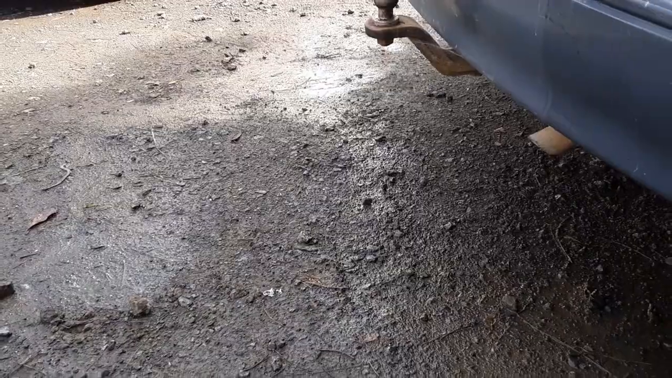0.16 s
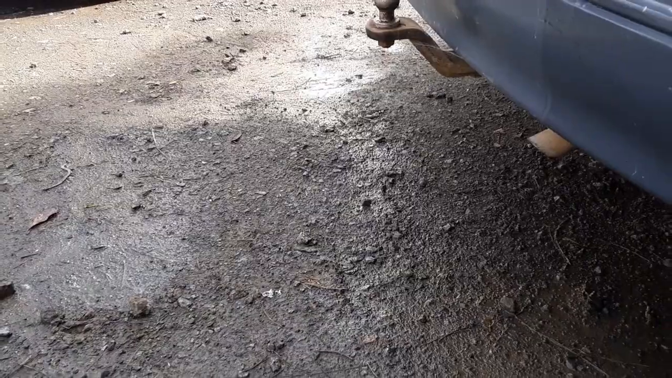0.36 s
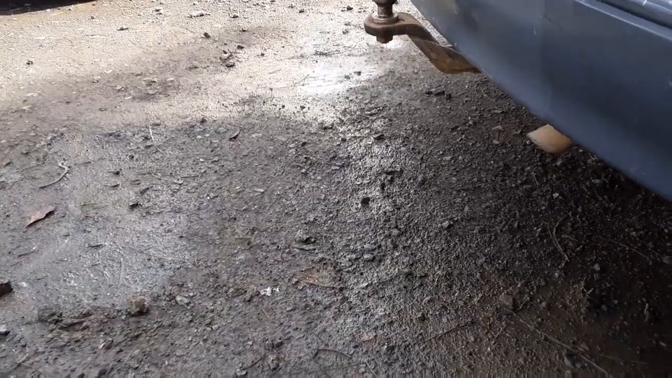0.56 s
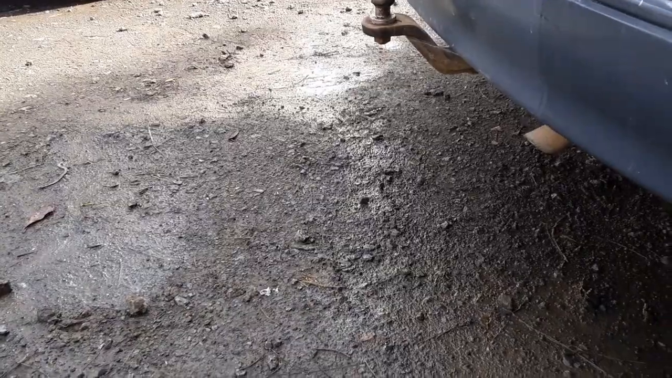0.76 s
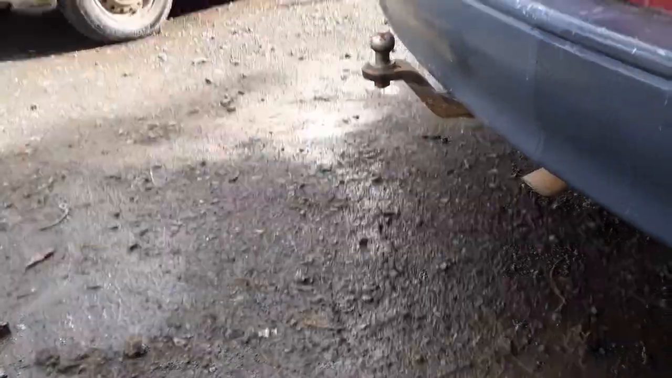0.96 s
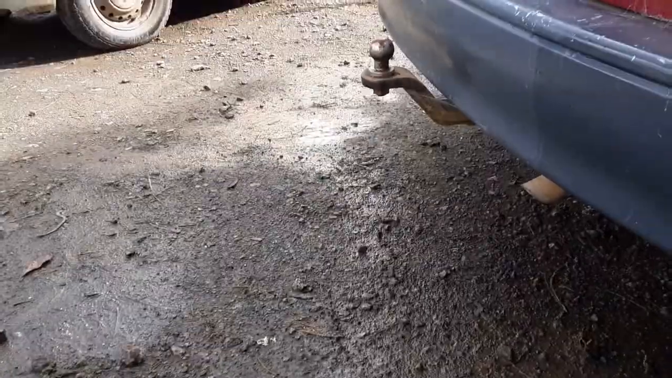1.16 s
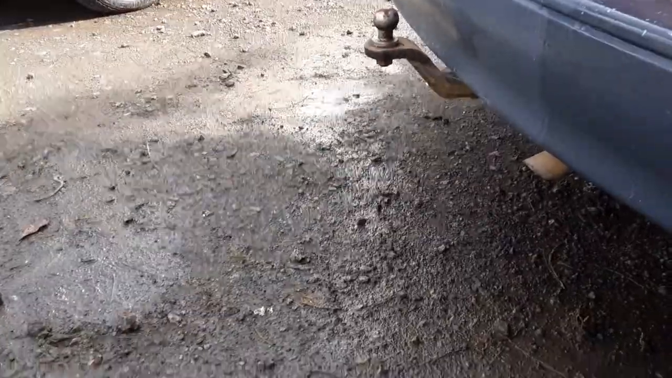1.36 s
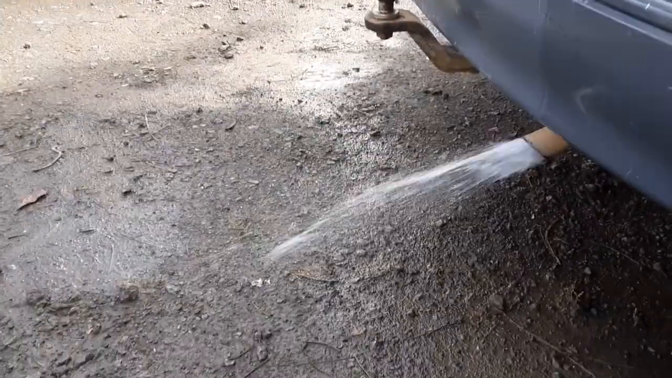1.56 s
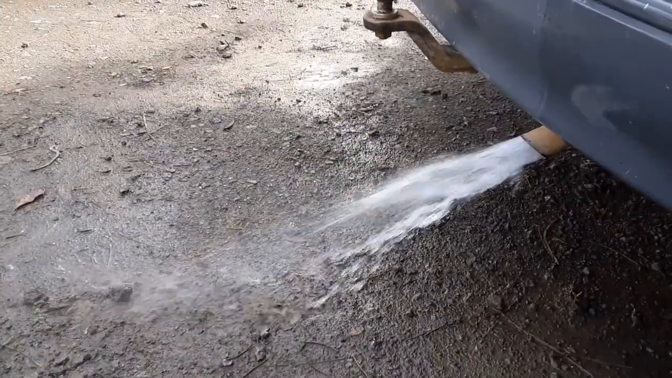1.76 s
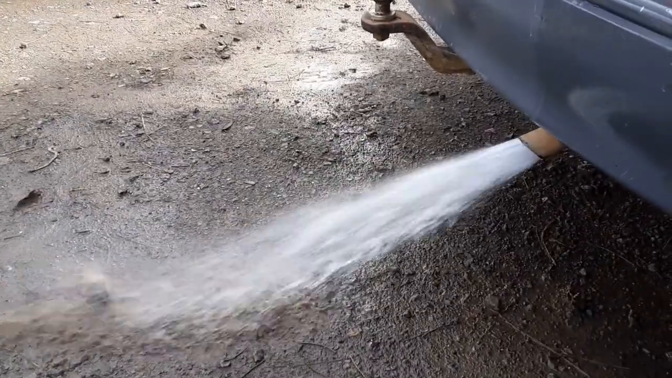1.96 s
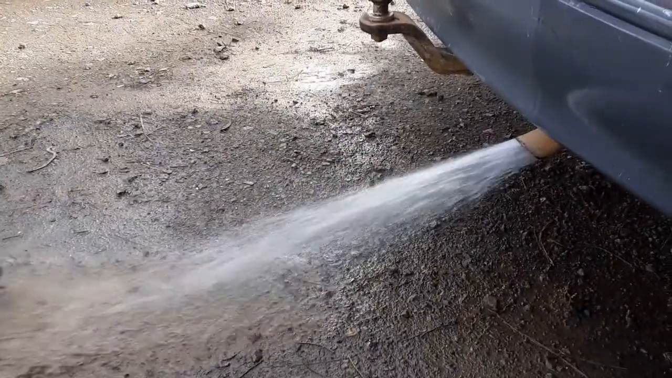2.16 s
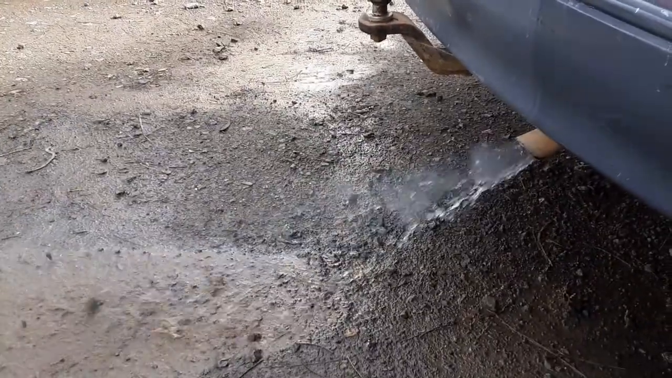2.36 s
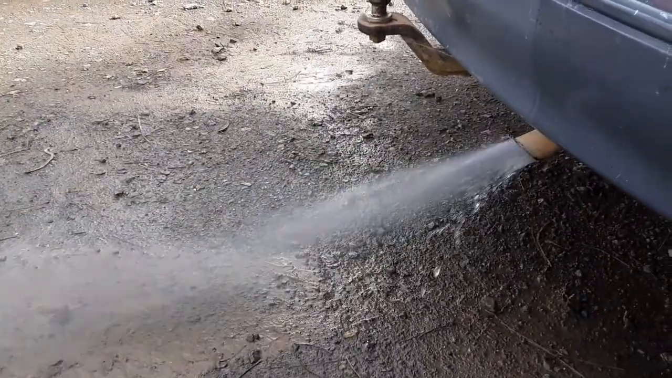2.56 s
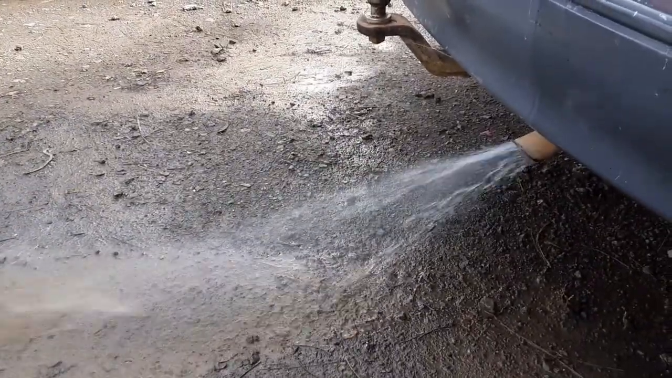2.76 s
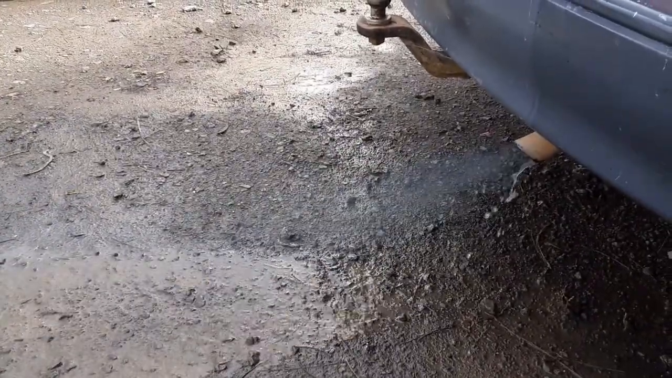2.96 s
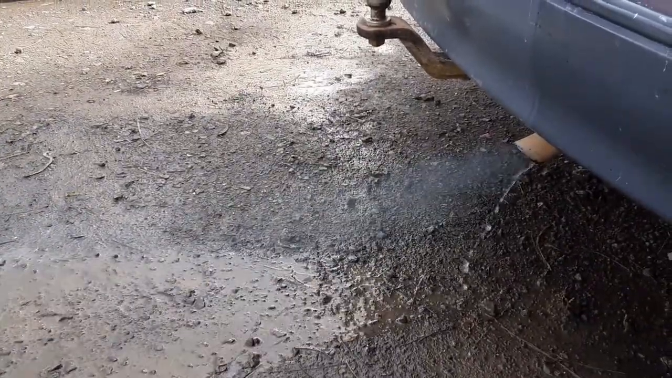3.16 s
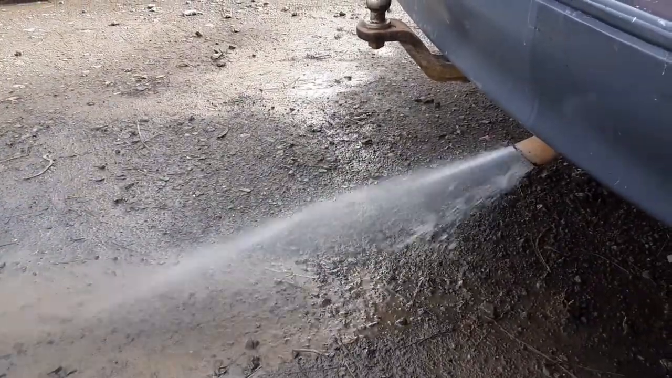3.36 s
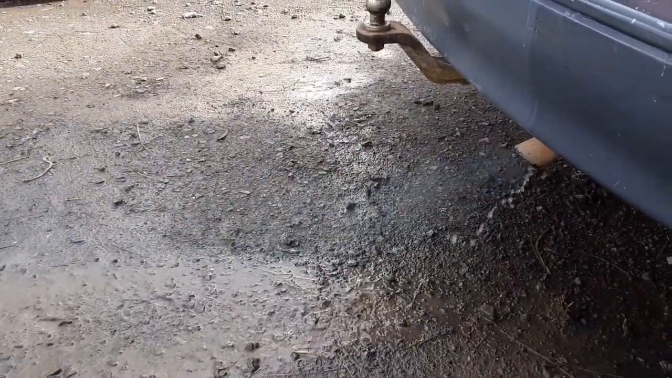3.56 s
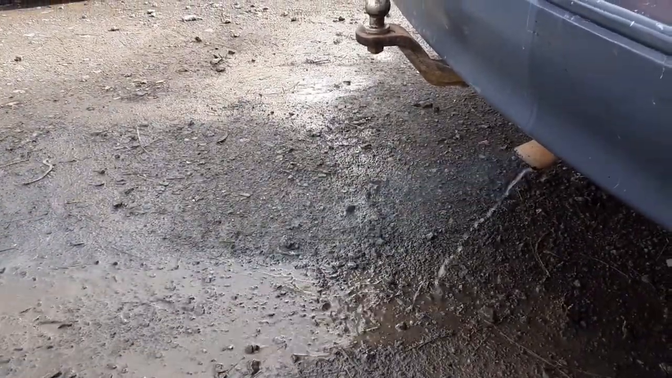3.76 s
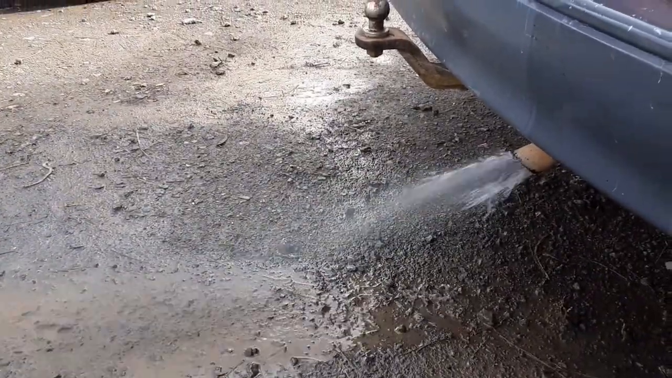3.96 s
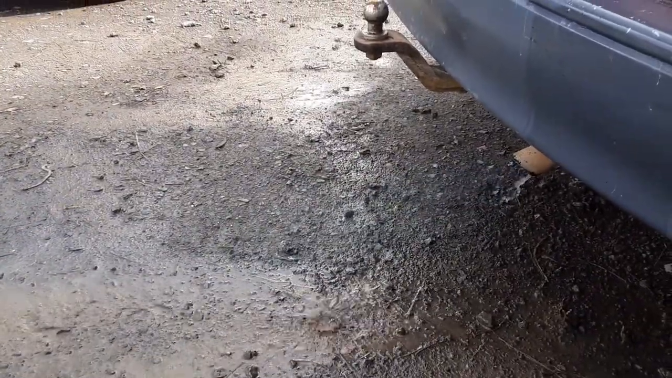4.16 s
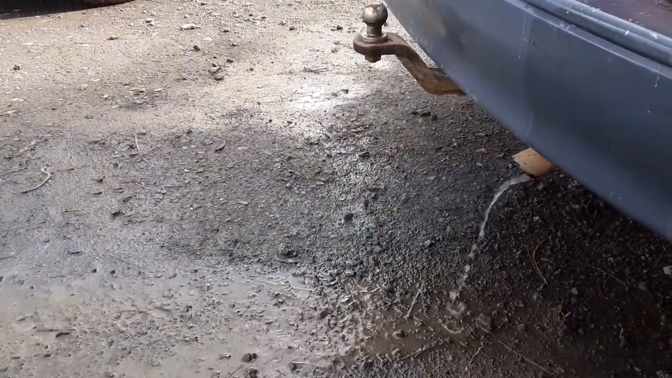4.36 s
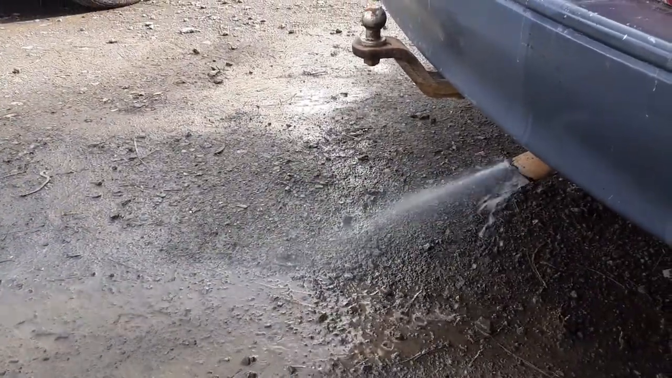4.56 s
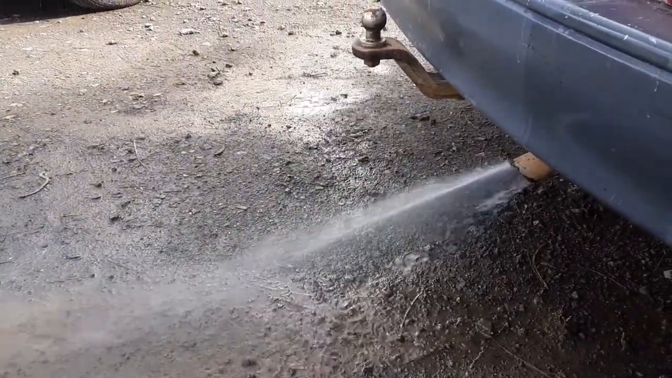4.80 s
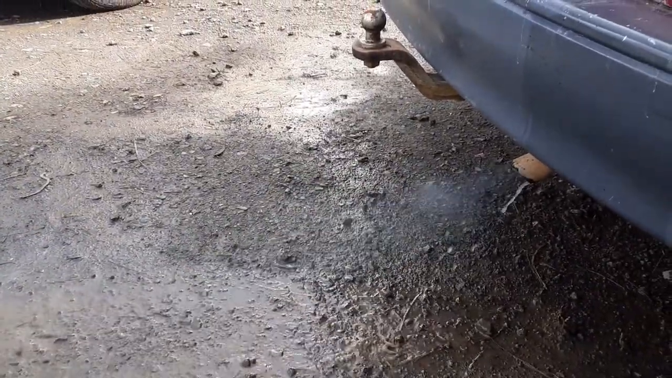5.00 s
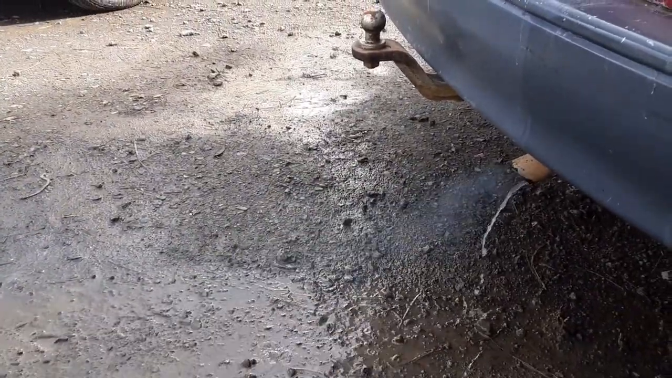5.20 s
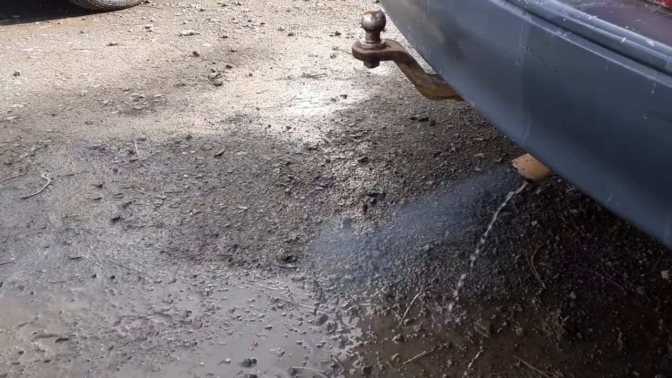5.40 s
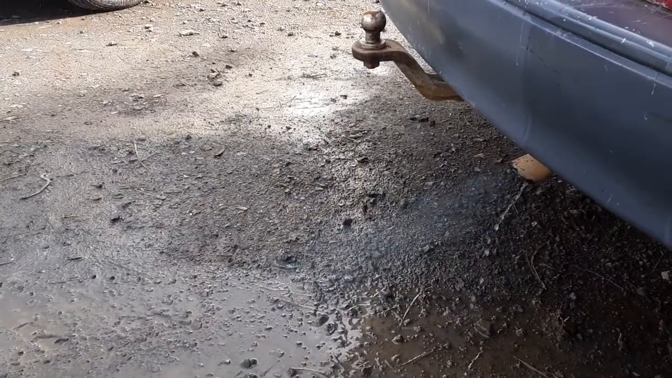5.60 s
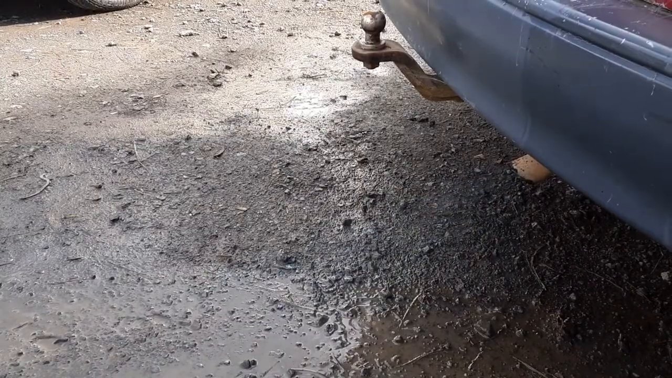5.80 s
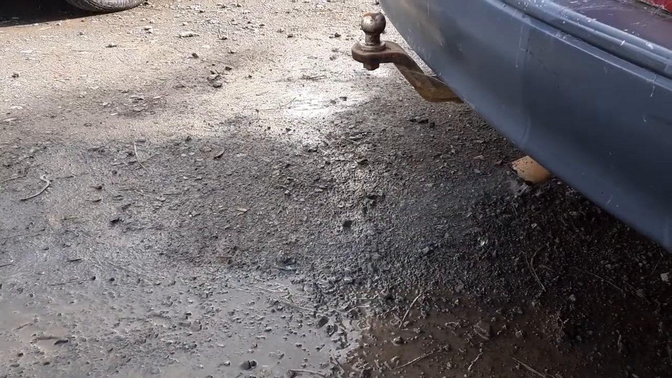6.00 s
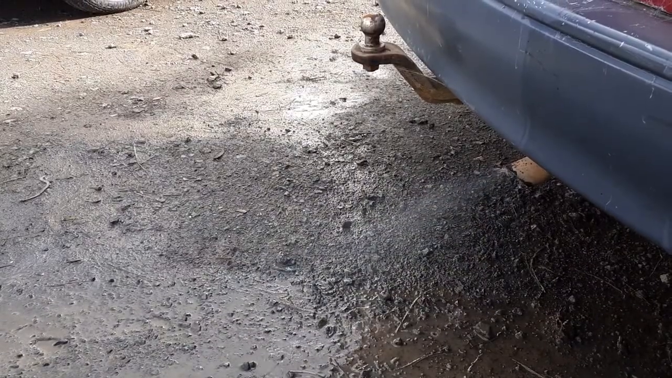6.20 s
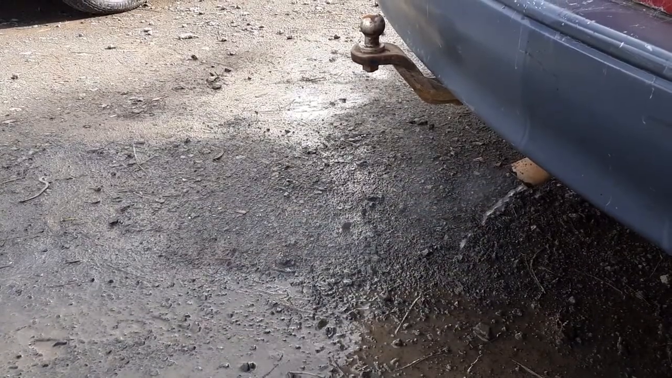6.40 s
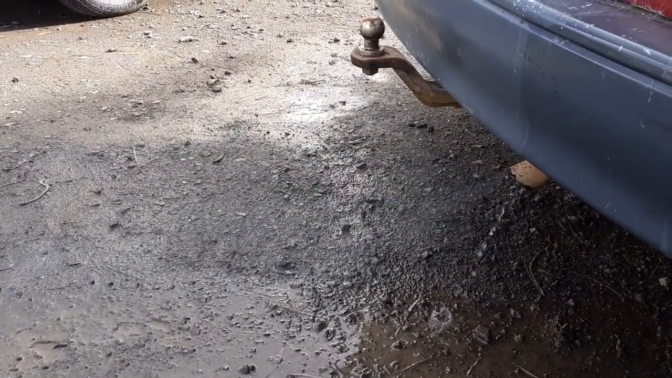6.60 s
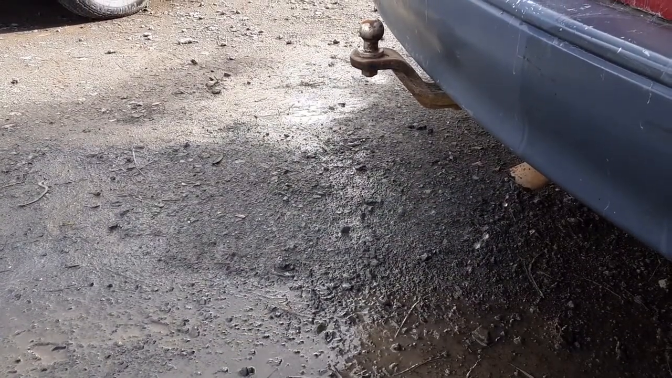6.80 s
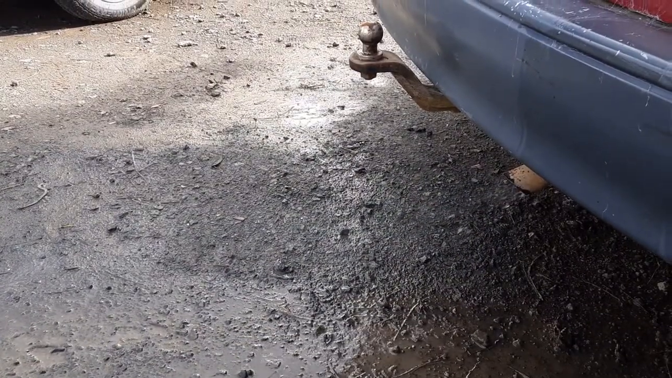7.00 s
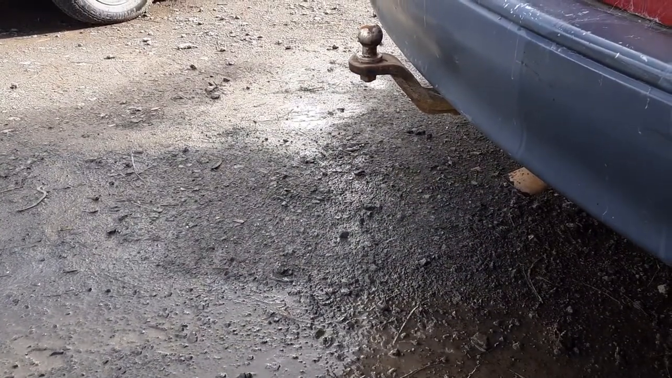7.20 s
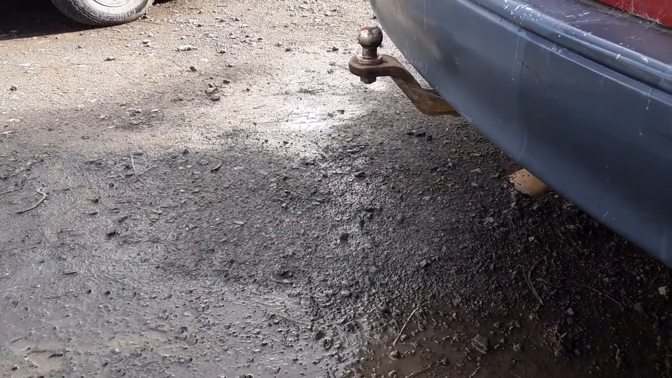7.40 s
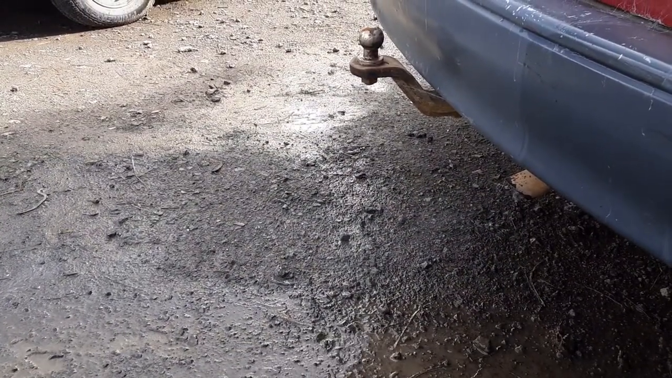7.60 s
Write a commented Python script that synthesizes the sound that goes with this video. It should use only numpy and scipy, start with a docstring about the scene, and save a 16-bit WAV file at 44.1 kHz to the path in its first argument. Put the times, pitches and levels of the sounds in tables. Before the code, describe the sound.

A four-cylinder engine with water in its exhaust starts in an open gravel yard, heard near the pipe. Soft clicks and thuds come first, then a gritty metallic starter straining against each compression. Spits and deep gulps lead into five surging revs, bassy and rough, the early ones wettest with loud rushing spray. A narrow rattle passes as the speed drops; bubbling, slopping idle and small ticks continue to the end.

```python
"""A four-cylinder car engine with water in its exhaust, heard from beside the tailpipe. Knocks of key and pedal
and a starter labouring over each compression lead to five revs that blow water onto gravel, then a gurgling idle.
The exhaust adds sine waves at the firing rate to bubbles, pulses and coloured noise that follow speed and pedal.
Gulps and knocks are short dying rings; ticks, spits, the grinding starter and the yard are shaped noise."""
import sys
import numpy as np
from scipy import signal
from scipy.fft import rfft, irfft, next_fast_len
from scipy.io import wavfile
from scipy.ndimage import uniform_filter1d, map_coordinates

SR = 44100
rng = np.random.default_rng(int(sys.argv[2]) if len(sys.argv) > 2 else 0)


def store_wav(level_fs):
    """Save 16-bit WAV to argv[1]."""
    pcm = np.round(np.clip(np.atleast_2d(level_fs), -1, 1) * 32767)
    wavfile.write(sys.argv[1], SR, pcm.T.astype(np.int16))


def volts(x):
    """Linear amplitude factor 10**(x/20) for a level x in dB, scalar or array-like."""
    e = np.asarray(x, float) / 20
    return 10 ** e


N = 337365  # length [samples]

# resonances of the engine block and cover: (frequency [Hz], width [Hz], level [dB])
METAL = [(830, 32, 0.5), (1225, 22, -3.5), (2070, 130, 2), (2460, 170, -3.5), (3250, 250, -4.5),
         (3850, 150, -9), (4210, 110, -3.5), (5560, 120, -6), (6400, 290, -8.5), (8900, 1400, -18)]
# resonances of the exhaust system: (frequency [Hz], width [Hz], level [dB])
PIPE = [(48.6, 33, -8.5), (74.8, 47, -3), (166.3, 49.4, -2.5), (250, 31.8, -0.5), (339.6, 51.3, -8.5)]
# the foot moves the pedal: (time [s], new position [0-1])
PEDAL = [(1.5, 1), (1.759, .95), (2.21, 0.32), (2.59, 0.91), (2.84, 0.47), (3.28, 0.86), (3.5, 0.51),
         (3.882, .85), (4.15, 0.55), (4.492, 0.84), (4.93, 0.5), (5.3, .55), (5.455, 0.13), (5.9, 0),
         (6.24, 0.3), (6.55, 0)]
# starter strokes: (start [s], end [s], grind level [dB], shudder level [dB], load at the start [0-1])
STROKES = [(0.866, 0.989, -30, -40.5, 0.97), (1.072, 1.175, -26.5, -38.5, 0.04),
           (1.267, 1.323, -26, -30.5, 0.23), (1.377, 1.384, -44, -23.5, .6),
           (1.419, 1.47, -25.5, -31.5, .3), (1.501, 1.523, -32.5, -26.5, 0.56),
           (1.6, 1.613, -42, -24.5, .6)]


def exhaust():
    """Firing notes, wet gurgle and rushing gas and water, all driven by engine speed and pedal."""
    # engine speed: (time [s], rate [firings per second])
    speed = [(1.6, 49), (1.79, 56), (1.93, 79.3), (2.05, 98.4), (2.19, 132), (2.3, 105.3), (2.52, 96.4),
             (2.61, 75), (2.71, 94.7), (2.8, 128), (2.87, 116.4), (3.09, 96), (3.27, 75.4), (3.5, 104.6),
             (3.63, 95.4), (3.75, 80.3), (3.89, 63), (4.11, 102), (4.28, 91), (4.5, 63.4), (4.7, 98.6),
             (4.85, 127.4), (4.96, 135), (5.15, 107), (5.4, 84.8), (5.54, 86), (5.77, 59), (5.95, 34.8)]
    # water blown out of the pipe: (time [s], amount [dB])
    water = [(1.47, 2), (1.55, -3), (1.9, 6.5), (2.2, 9), (2.39, 10), (2.5, -3), (2.8, -2), (4.1, -6.5),
             (5.0, -2.5), (5.7, -9.5)]
    # how each layer follows the controls: (base level at 100 firings a second with the pedal up [dB],
    # speed [dB per octave], full pedal [dB], share of the water [dB per dB], snap [dB])
    gurgle_law = (-25.5, 2.5, 2.5, -0.22, 2)
    roar_law = (-39.5, 4, 13, 0.04, 10)
    jet_law = (-50.5, 4.5, 16.5, 0.41, 16)
    splash_law = (-53.5, -1.5, 14.5, 1.23, 19)
    intake_law = (-63.5, 3.5, 19.5, 0.97, 18)
    patter_law = (-59.5, 15, 13, 1.3, .1)
    hz, revving = curves(speed)
    turns = np.cumsum(hz) / SR  # firings so far
    flow, snap = pedal()
    controls = np.array([np.ones(N), np.log2(hz / 100), flow, curves(water)[0], snap])
    slop_db = slops()
    # the gurgle calms by 3 dB once the revs have settled
    gurgle_db = gurgle_law @ controls + slop_db - 3 * (1 - revving)
    roar_db = roar_law @ controls + 0.19 * slop_db
    # one valve clatters once per camshaft turn, which is four firings
    cam = 1 + revving * 0.6 * np.exp(-(turns / 4 % 1) / 0.13)
    clattering = jet(jet_law @ controls, revving) + splash(splash_law @ controls) + intake(intake_law @ controls)
    wet = gurgle(gurgle_db, turns, revving) + froth(slop_db, revving) + patter(patter_law @ controls)
    running = np.clip((np.arange(N) / SR - PEDAL[0][0]) / 0.088, 0, 1)
    layers = wet + roar(roar_db, turns, revving) + cam * clattering
    return nearby(revving * firing_notes(hz, turns, flow)) + running * layers


def pedal():
    """Gas flow follows a press fast and a lift slowly; each press starts with a snap of air."""
    press_s, lift_s = 0.018, 0.05  # time constants
    s, position = np.transpose(PEDAL)
    step = np.diff(position, prepend=0)
    since = np.maximum(np.arange(N) / SR - s[:, None], 0)
    lag = np.where(step > 0, press_s, lift_s)[:, None]
    flow = step @ (1 - np.exp(-since / lag))
    return flow, puffs(s, 2 * np.maximum(step, 0), t60=0.048)


def slops():
    """Water slops in the silencer at idle: extra dB that rise quickly and sink more slowly."""
    # slops: (time [s], length [s], level over the steady gurgle [dB])
    slop_list = [(6.265, 0.24, 4), (6.454, 0.39, 5.5), (6.915, 0.085, 2.5), (7.063, 0.026, 10),
                 (7.162, 0.13, 9.5), (7.394, 0.027, -3)]
    s, length, db = np.transpose(slop_list)
    u = (np.arange(N) / SR - s[:, None]) / length[:, None]
    return db @ np.clip(np.minimum(6 * u, 1.2 - u), 0, 1)


def firing_notes(hz, turns, flow):
    """Sines at one, two and three times the firing rate, as loud as the pipe answers each pitch."""
    # the pipe's answer to the firing rate, pedal down and pedal up: (frequency [Hz], level [dB])
    first_down = [(45, -49), (55, -20), (65, -17), (78, -28), (98, -15.5), (110, -12.5), (125, -14),
                  (135, -9)]
    first_up = [(45, -30), (58, -22), (70, -12), (82, -14), (90, -20.5), (97, -27.5), (104, -17),
                (115, -13.5), (135, -8.5)]
    # its answer to twice that rate, pedal down and pedal up: (frequency [Hz], level [dB])
    second_down = [(90, -40), (105, -22.5), (130, -20.5), (165, -23), (195, -29.5), (215, -44), (270, -49)]
    second_up = [(90, -38), (130, -32.5), (160, -23.5), (190, -37.5), (215, -30.5), (232, -24.5),
                 (250, -27), (270, -38.5)]
    # its answer to three times that rate, pedal up: (frequency [Hz], level [dB])
    third_up = [(170, -35), (215, -30), (240, -22), (258, -20), (280, -34.5), (330, -52)]
    answers = [(1, first_down, first_up), (2, second_down, second_up), (3, [(250, -45)], third_up)]
    down = np.clip((flow - .55) / .2, 0, 1)
    starved_db = 50 * np.minimum(flow - .33, 0)  # the notes fade below a light throttle
    unsteady = .15 * wobble(30)  # radians per order
    total = 0
    for k, pressed, lifted in answers:
        db = down * along(pressed, k * hz) + (1 - down) * along(lifted, k * hz) + starved_db
        total = total + volts(db + 1.25 * wobble(25)) * np.sin(k * (2 * np.pi * turns + unsteady))
    return total


def silenced(x):
    """The exhaust system resonates, and its silencer passes only the bass; rms 1."""
    return unit(filtered(resonant(x, PIPE), lambda f: 1 / ((1 - 1j * 30 / (f + 1)) * (1 + 1j * f / 420)) ** 2))


def gurgle(level_db, turns, revving):
    """Water in the silencer lets the gas through in lumps: bubbles, uneven firing pulses and low noise."""
    # one pulse per firing, of uneven size
    firings = revving * np.diff(np.floor(turns), prepend=0) * (1 + 0.65 * rng.standard_normal(N))
    pulses = filtered(firings, lambda f: 1j * f)  # lifts the higher frequencies
    when, pitch, size = rng.random((900, 3)).T
    bubble_hz = 150 * 2.21 ** (2 * pitch - 1)
    bubbles = rings(when * N / SR, bubble_hz, volts(13.7 * size), cycles=1.94, rise=0.039)
    lumps = nearby(silenced(bubbles) + 0.48 * silenced(pulses))
    rush = (0.74 + 0.48 * revving) * ports(*silenced(noise()))
    return volts(level_db + 1.2 * wobble(8)) * unit(lumps + rush)


def froth(slop_db, revving):
    """Slopping water at idle: low noise that grows faster than the slops themselves."""
    # colour of the slopping water: (frequency [Hz], level [dB])
    froth_colour = [(25, -1), (45, 10), (120, -14), (300, -0.5), (450, -5), (700, -9), (1200, -24),
                    (2500, -50)]
    level_db = -49 + 1.7 * slop_db + 3.8 * wobble(45)
    return (1 - revving) * volts(level_db) * ports(*coloured(noise(), froth_colour))


def roar(level_db, turns, revving):
    """Rushing gas that throbs with the firings, coloured by ringing panels or the engine block."""
    # colour of the gas roar: (frequency [Hz], level [dB])
    roar_colour = [(250, -10), (420, -19), (450, -8), (536, 1.5), (950, -1.5), (1310, -7.5), (1550, -4.5),
                   (1800, -13), (2270, -9.5), (2600, -15.5), (3380, -53), (5720, -120)]
    # underbody panels that colour the roar: (frequency [Hz], width [Hz], level [dB])
    panel_modes = [(688, 51, 0), (833, 54, 0.5), (946, 33, 1.5), (1094, 29, 2.5), (1217, 19, -1),
                   (1381, 120, -6), (1628, 126, -7.5)]
    panels = revving * unit(resonant(noise(), panel_modes))
    # at idle the two lowest notes of the block stand out instead of the panels
    block = (1 - revving) * 0.8 * volts(2.2 * wobble(9)) * unit(resonant(noise(), METAL[:2]))
    throb = 1 + revving * 0.2 * np.cos(2 * np.pi * turns)
    gas = coloured(patchy(patchy_db=0.5), roar_colour)
    return volts(level_db + wobble(35)) * throb * ports(*unit(gas + panels + block))


def jet(level_db, revving):
    """Gas hissing from the pipe, with noise through the resonances of the engine's metal."""
    # colour of the gas jet: (frequency [Hz], level [dB])
    jet_colour = [(1300, -34), (1900, 6), (2300, -0.5), (2900, -0.5), (4300, -2), (5600, -5), (9000, -18),
                  (11500, -38)]
    metal = (1.3 - 0.59 * revving) * unit(resonant(noise(), METAL))
    return volts(level_db + wobble(22)) * ports(*(coloured(patchy(patchy_db=3.5), jet_colour) + metal))


def splash(level_db):
    """Blown water and vapour: bright noise sprinkled with stronger drops."""
    # colour of the splash: (frequency [Hz], level [dB])
    splash_colour = [(3500, -53), (5500, -5.5), (6800, 5), (8000, 0.5), (9600, 0.5), (10600, -8),
                     (12000, -46)]
    drops = patchy(patchy_db=2.5) * (1.3 + (rng.random(N) < .02) * 1.2)
    return volts(level_db + 1.8 * wobble(16)) * ports(*coloured(drops, splash_colour))


def patter(level_db):
    """Heavier drops that land on the gravel a moment later: grainy noise with a delayed level."""
    # colour of the heavier drops on the gravel: (frequency [Hz], level [dB])
    patter_colour = [(2200, -30), (3300, -12), (4500, 0.5), (6000, 4), (8000, -27)]
    flight_s = 0.11
    drops = patchy(patchy_db=6.5) * (0.73 + (rng.random(N) < .01) * 2.9)
    landed_db = np.roll(level_db, int(flight_s * SR))
    return volts(landed_db + 1.3 * wobble(20)) * ports(*coloured(drops, patter_colour))


def intake(level_db):
    """Air sucked into the engine: a very high hiss."""
    # colour of the intake hiss: (frequency [Hz], level [dB])
    intake_colour = [(6000, -18), (10500, -1.5), (15800, -1.5), (16000, -52)]
    return volts(level_db + 0.64 * wobble(16)) * ports(*coloured(patchy(patchy_db=2.5), intake_colour))


def gulps():
    """Gas bursts through the water: a short low ring of the pipe, a weaker overtone and a puff of gas."""
    # gulps: (time [s], level [dB], pitch [Hz], puff relative to that level [dB])
    gulp_list = [(1.301, -16.5, 122, -6), (1.374, -7.5, 155, -8), (1.402, -23, 209, -7),
                 (1.516, -6.5, 156, -11), (1.564, -18, 74.4, -14), (1.598, -26, 74.6, -5),
                 (1.63, -9.5, 77.6, -28), (2.17, -13.5, 135, -1), (5.698, -8.5, 112, -23),
                 (5.947, -17.5, 95.03, -30), (6.266, -13.5, 97.4, -42), (6.357, -15, 71.5, -14),
                 (6.469, -15, 109.6, -6.5), (6.506, -17.5, 240, -5), (6.579, -13.5, 77.1, -19),
                 (6.598, -13, 250, -30), (6.689, -17, 85, -27), (6.912, -12.5, 90, -25),
                 (6.946, -19, 128, -29), (7.062, -18, 106, -28), (7.088, -11.5, 198, -22),
                 (7.134, -14.5, 149, -19), (7.165, -17, 89, -15.5), (7.182, -11, 233, -22),
                 (7.259, -22, 164, -25), (7.369, -24.5, 76, -23.5), (7.407, -21, 180, -27),
                 (7.499, -30, 82, -16)]
    s, db, hz, puff_db = np.transpose(gulp_list)
    ring = rings(s, hz, volts(db - 3.5), cycles=1.43, rise=0.015)
    overtone = rings(s + 0.00418, 1.736 * hz, volts(db - 14), cycles=2.5, rise=0.021)
    gas = coloured(noise(), [(250, -25), (500, -1.5), (2500, -18), (5000, -45)])
    return nearby(ring + overtone) + puffs(s, volts(db + puff_db - 7), t60=0.11) * ports(*gas)


def spits():
    """The first water spat from the pipe: short broad splutters of noise."""
    # spits: (time [s], level [dB])
    spit_list = [(1.5118, -24), (1.5667, -22), (1.6036, -30), (1.634, -14), (1.7343, -12), (1.86, -16),
                 (1.8994, -23)]
    s, db = np.transpose(spit_list)
    spray = coloured(noise(), [(400, -20), (1200, 12.5), (3000, -3.5), (9000, -30), (11000, -14), (16000, -29)])
    return puffs(s, volts(db - 6.5), t60=0.12) * ports(*spray)


def buzz():
    """A panel rings as the revs fall through its note: a narrow rattle that swells and stops."""
    # the panel's note: (start [s], end [s], frequency [Hz], width of each of two passes [Hz], level [dB])
    panel_note = (5, 5.5, 1502, 105, -39.5)
    start, end, hz, width, db = panel_note
    u = (np.arange(N) / SR - start) / (end - start)
    swell = np.sqrt(np.clip(np.minimum(u, 6 * (1 - u)), 0, 1))
    once = resonant(noise(), [(hz, width, 0)])
    return volts(db) * swell * ports(*unit(resonant(once, [(hz, width, 0)])))


def ticks():
    """Valve gear ticks: short puffs of noise through the resonances of the engine's metal."""
    # marks between which the ticks are evenly spaced: (time [s], level [dB])
    marks = [(5.732, -42), (5.85, -37), (5.958, -44), (6.121, -49.5), (6.309, -32.5), (6.468, -50.5),
             (6.783, -50), (6.9083, -38.5), (7.062, -40.5), (7.609, -38)]
    # ticks counted up to each mark: (count [ticks])
    ticks_so_far = [0, 3, 5, 9, 15, 20, 30, 34, 39, 55]
    # ticks out of step: (time [s], level [dB])
    hard_ticks = [(6.334, -41), (6.6676, -33.5), (6.8896, -34)]
    count = np.arange(ticks_so_far[-1] + 1)
    s, db = [np.interp(count, ticks_so_far, column) for column in np.transpose(marks)]
    db = db + 2.8 * rng.standard_normal(len(s))
    s, db = np.hstack([[s, db], np.transpose(hard_ticks)])
    broad = coloured(noise(), [(1200, 2), (2200, -9.0), (9500, -5), (11000, -8), (15800, -9), (16000, -60)])
    metal = unit(resonant(noise(), METAL))
    return puffs(s, volts(db - 2.0), t60=0.082) * ports(*(metal + 0.38 * broad))


def starter():
    """Gear teeth grind into the housing on each stroke while the car body shudders."""
    # resonances of pinion and bell housing under full load: (frequency [Hz], width [Hz], level [dB])
    gear = [(610, 230, -7), (1027, 63, 3), (1340, 54, -3), (1584, 100, -4.5), (2010, 125, -5.5),
            (2790, 480, -11.5), (3670, 340, -17), (4910, 210, -12.5)]
    # the pinion strikes the ring gear: (time [s], whine level [dB])
    clacks = [(0.867, -26.5), (1.38, -36), (1.421, -36), (1.517, -25), (1.565, -26)]
    sag = 1.45  # the pinion's notes lie this many times higher without load
    whirr_hz, whirr_db = 1063, -4  # its strongest note under full load; level relative to the grind
    grind_db = strokes(column=2, coast_db=-44)
    shudder_db = strokes(column=3, coast_db=-45)
    cranking = curves([(STROKES[0][0] - .02, 0), (STROKES[-1][1], 0)])[1]
    teeth = np.cumsum(190 * (1 + .1 * wobble(12))) / SR % 1  # place within one tooth, about 190 teeth a second
    mesh = patchy(patchy_db=2) * (0.6 + np.exp(-teeth / 0.16)) * volts(0.78 * wobble(70))
    # the ring of the pinion sinks as the load builds through each stroke
    load_points = []
    for start, end, _, _, first in STROKES:
        load_points += [(start - .004, 1), (start, first), (end, 1)]
    load = curves(load_points)[0]
    housing = 0
    for k in range(4):  # crossfade through four tunings, from no load to full load
        share = np.clip(1 - abs(3 * load - k), 0, 1) ** .5
        pinion = [(hz * sag ** (1 - k / 3), width, db) for hz, width, db in gear[:5]]
        housing = housing + share * resonant(mesh, pinion + gear[5:])
    pitch = whirr_hz * sag ** (1 - load ** 1.4) * (1 + 0.0308 * wobble(150))
    whirr = volts(whirr_db + 3.4 * wobble(90.14)) * np.sin(2 * np.pi * np.cumsum(pitch) / SR)
    grind = volts(grind_db) * (unit(housing) + whirr)
    s, db = np.transpose(clacks)
    whine_size = volts(grind_db - 16) + volts(-52) + puffs(s, volts(db), t60=.12)
    whine = whine_size * coloured(mesh, [(2500, -2.5), (4000, -9.5), (6000, -3), (9500, -9.0), (11000, -15),
                                         (15800, -25), (16000, -45)])
    shudder = volts(shudder_db) * unit(resonant(noise(), PIPE))
    return cranking * ports(*(grind + whine + shudder))


def strokes(column, coast_db):
    """Level in dB of the stroke that sounds loudest: bite, swell, release to the coasting level."""
    bite_s, swell_db, release_db_per_s = 0.0054, 3, 336
    t, rows = np.arange(N) / SR, np.array(STROKES)
    start, end, db = rows[:, :1], rows[:, 1:2], rows[:, column:column + 1]
    held = db - swell_db * np.clip((end - t) / 0.15, 0, 1)
    bite = 20 * np.maximum(start + bite_s - t, 0) / bite_s
    release = release_db_per_s * np.maximum(t - end, 0)
    return np.maximum(coast_db, np.max(held - bite - release, axis=0))


def knocks():
    """Key and pedal: a dull thud through the body and a small rattle, coloured by the part touched."""
    # knocks in the cabin: (time [s], click level [dB], thud relative to it [dB], thud pitch [Hz], click pitch [Hz])
    knock_list = [(0.0154, -39, -26, 184, 2950), (0.043, -52, 1, 88, 1110), (0.0753, -40.5, -18, 188, 3980),
                  (0.157, -40.5, -4, 241, 1330), (0.1754, -45, 0, 138, 1480),
                  (0.197, -44.5, -10, 54.3, 1510), (0.599, -42.5, -1, 216, 1070),
                  (0.624, -59, 23, 72, 1090), (0.7136, -42, 5, 161, 955), (0.739, -53, 11, 78.1, 1010),
                  (0.77, -69, 13, 78.1, 902)]
    s, db, thud_db, thud_hz, click_hz = np.transpose(knock_list)
    loose = coloured(noise(), [(200, -3), (600, 4.5), (1500, -6), (4000, -8), (10000, -15.5), (16000, -42)])
    rattle = puffs(s, volts(db - 5.5), t60=0.13) * ports(*loose)
    bounce = 0.021 * rng.random((len(s), 3))  # each click sounds three times, up to 21 ms late
    click = sum(rings(s + late, click_hz, volts(db - 0.5), cycles=2.0, rise=.001) for late in bounce.T)
    thud = rings(s, thud_hz, volts(db + thud_db + 3.5), cycles=1.9, rise=0.017)
    return rattle + nearby(click + thud)


def yard():
    """Quiet outdoor air as coloured noise, and a low shaking that comes and goes before the start."""
    # low shaking: (time [s], level [dB])
    shaking = [(0.0, -63), (0.108, -62), (0.17, -50), (0.31, -68.5), (0.552, -82), (0.62, -62),
               (0.74, -46.5), (0.782, -53), (0.84, -64)]
    # colour of the outdoor air: (frequency [Hz], level [dB])
    air_colour = [(18, -54), (30, -24), (70, -18), (227, -16), (449, -6), (499, -11), (540, -1.5),
                  (1250, -15.5), (2230, -18), (8520, -28), (16000, -43)]
    rumble_db, before = curves(shaking)
    low = coloured(noise(), [(25, -20), (60, 2), (200, 2), (350, -1.5), (600, -50)])
    air = volts(-59 + 0.58 * wobble(3.33)) * coloured(noise(), air_colour)
    return ports(*(air + before * volts(rumble_db + 4.5) * low))


def nearby(x):
    """A point source and its scatter off ground and underbody, which shifts as the hand-held microphone moves."""
    knots = np.cumsum(rng.random(402)) * 1.66  # phase of the scatter [radians], growing with frequency
    scatter = filtered(x, lambda hz: np.exp(-1j * map_coordinates(knots, [hz / SR * 800])))
    return ports(x, wobble(5) * scatter)


def ports(a, b):
    """Two unrelated draws of one sound, mixed so that left and right are alike as at two microphone ports."""
    # likeness of left and right: (frequency [Hz], correlation [-1 to 1])
    alike = [(30, 0.52), (100, 1), (300, 0.89), (700, 0.8), (1400, 0.91), (2600, 0.24), (4500, 0.3),
             (6800, 0.09), (7600, 1), (15000, 0.94)]

    def weights(hz):
        turn = np.arccos(np.clip(along(alike, hz), -1, 1)) / 2
        return np.array([np.cos(turn), np.sin(turn)])

    mid, side = filtered(np.array([a, b]), weights)
    return np.array([mid + side, mid - side])


def rings(s, hz, size, cycles, rise):
    """Damped sines with a soft start whose pitch rises, as bubbles do."""
    t = np.arange(int(.09 * SR)) / SR
    u = hz[:, None] * t  # cycles since the start
    tone = np.sin(2 * np.pi * u * (1 + rise * u / cycles))
    swell_and_fade = u / cycles * np.exp(1 - u / cycles * 2) * 2
    wave = size[:, None] * tone * swell_and_fade
    at = (s * SR).astype(int)[:, None] + np.arange(len(t))
    return np.bincount(at.ravel(), wave.ravel(), N + SR)[:N]


def puffs(s, size, t60):
    """An envelope that jumps within a few ms at each event and falls 60 dB in t60 seconds."""
    t = np.arange(6000) / SR
    shape = (1 - np.exp(-t / 0.0022)) * volts(-60 * t / t60)
    return np.abs(signal.fftconvolve(np.bincount((s * SR).astype(int), size, N), shape)[:N])


def noise():
    """Two channels of white noise."""
    return rng.standard_normal((2, N))


def patchy(patchy_db):
    """Two channels of noise with random patches of gain over time and frequency."""
    z = signal.stft(noise(), nperseg=256)[2]
    field = uniform_filter1d(rng.standard_normal(z.shape[1:]), size=4, axis=0)  # smooth in frequency
    field = uniform_filter1d(field, size=9, axis=1)  # smooth in time
    return signal.istft(z * volts(patchy_db * unit(field)), nperseg=256)[1][:, :N]


def wobble(rate):
    """A smooth random curve, rate knots a second."""
    return map_coordinates(rng.standard_normal(int(N * rate / SR) + 4), [np.arange(N) * rate / SR])


def resonant(x, modes):
    """x through a body of resonances (frequency, width, dB), with signs that alternate."""
    def response(f):
        total = 0
        for k, (centre, width, db) in enumerate(modes):
            damping = 1j * f * width
            total = total + (-1) ** k * volts(db) * damping / (centre * centre - f * f + damping)
        return total

    return filtered(x, response)


def coloured(x, spectrum):
    """x with a (Hz, dB) colour, rms 1."""
    return unit(filtered(x, lambda hz: volts(along(spectrum, hz))))


def filtered(x, response):
    """x times a complex response of frequency."""
    m = next_fast_len(N + 8192)
    return irfft(rfft(x, m) * response(np.fft.rfftfreq(m, 1 / SR)), m)[..., :N]


def along(points, hz):
    """(Hz, value) points read on a log frequency axis."""
    f, v = np.transpose(points)
    return np.interp(np.log(hz + 1), np.log(f + 1), v)


def curves(rows):
    """One value per sample for each column after the time, and a gate that is open while the table lasts."""
    s, *columns = np.transpose(rows)
    t = np.arange(N) / SR
    gate = np.clip(np.minimum(t - s[0], s[-1] + .03 - t) / .03, 0, 1)
    return [np.interp(t, s, column) for column in columns] + [gate]


def unit(x):
    """Scaled to rms 1."""
    return x / np.sqrt(np.mean(x ** 2) + 1e-20)


def scene():
    """All sources together."""
    return exhaust() + gulps() + spits() + buzz() + ticks() + starter() + knocks() + yard()


def roll_off(x):
    """The treble ends steeply here."""
    return signal.sosfilt(signal.butter(12, 16590, fs=SR, output="sos"), x)


def record(dry):
    """Two spaced microphone ports hear each frequency with a phase difference."""
    # lead of the left port over the right: (frequency [Hz], phase [radians])
    lead = [(60, 0.3), (300, -0.25), (700, -0.48), (1500, -0.97), (2800, -1.22), (5000, -0.2), (6800, -2.2),
            (7600, 0)]
    mix = filtered(dry, lambda hz: np.exp(.5j * np.outer([1, -1], along(lead, hz))))
    return roll_off(mix)


dry = scene()
out = record(dry)
store_wav(out)
```